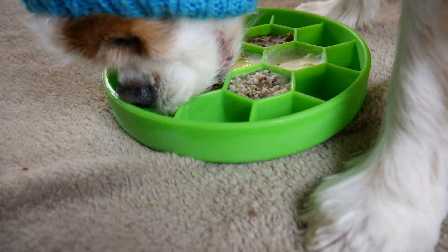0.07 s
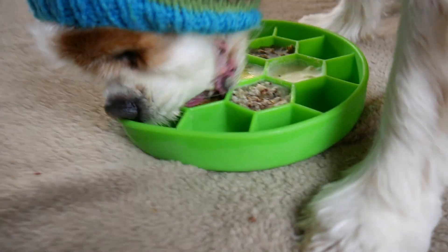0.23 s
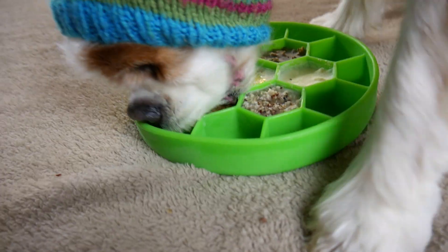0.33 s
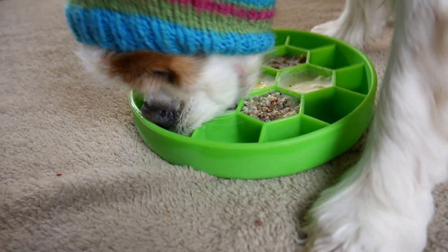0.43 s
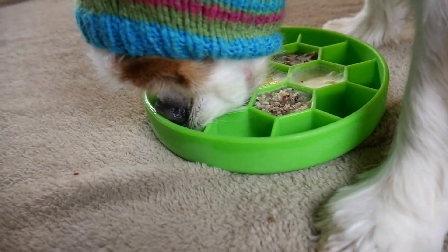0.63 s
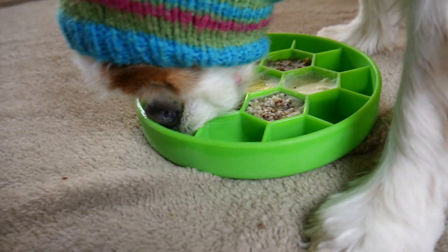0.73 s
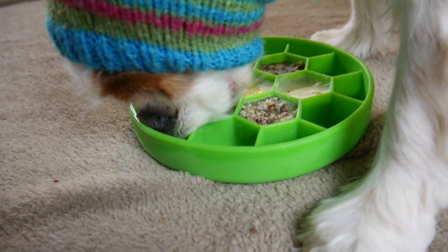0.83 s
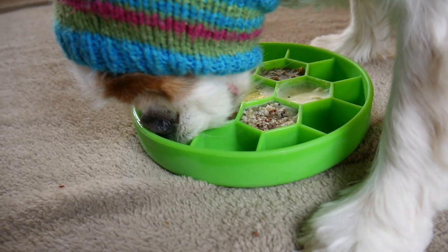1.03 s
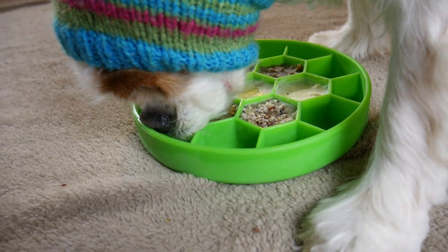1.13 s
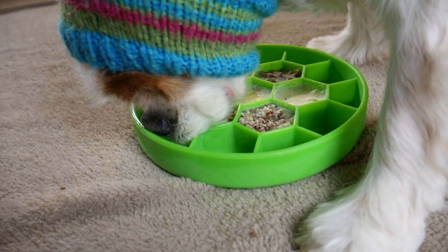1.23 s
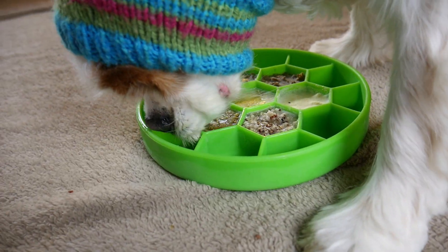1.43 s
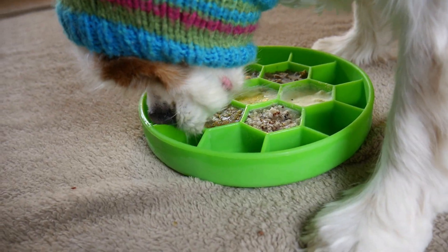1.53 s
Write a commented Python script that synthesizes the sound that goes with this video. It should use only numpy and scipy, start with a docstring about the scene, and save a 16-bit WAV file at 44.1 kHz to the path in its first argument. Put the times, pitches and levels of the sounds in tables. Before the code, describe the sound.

A dog eating hard frozen food, with sniffs, knocking bites and soft wet licks.

```python
"""A small dog works at frozen food in a silicone feeder bowl on a carpet, close by in a quiet room.
First it snuffles into the bowl, its breath hissing and resonating in the nose. Then it bites: teeth
knock on the hard food, dulled by the closed muzzle, and two hard bites push the bowl against the
floor, so that the room booms briefly. It goes on licking more softly: the tongue drags, small
cavities open with hollow pops and saliva films snap with wet clicks."""
import sys
import numpy as np
from scipy import signal
from scipy.fft import rfft, irfft
from scipy.io import wavfile

SR = 44100
rng = np.random.default_rng(int(sys.argv[2]) if len(sys.argv) > 2 else 0)


def store_wav(level_fs):
    """Save 16-bit WAV to argv[1]."""
    pcm = np.round(np.clip(np.atleast_2d(level_fs), -1, 1) * 32767)
    wavfile.write(sys.argv[1], SR, pcm.T.astype(np.int16))


N = 70560
T = np.arange(N) / SR
SHORT = T[:4096]   # time axis of one transient


def from_db(db):
    """Amplitude ratio of a level in decibels."""
    return 10 ** (np.asarray(db) / 20)


def peak_one(x):
    """Normalisation to a peak of 1."""
    return x / np.abs(x).max()


def rms_one(x):
    """Normalisation to an rms of 1."""
    return x / np.sqrt(np.mean(x ** 2) + 1e-20)


def cut(x, hz, kind, order=2):
    """Butterworth filter: maximally flat in its passband."""
    sections = signal.butter(order, np.clip(hz, 10, .45 * SR), kind, fs=SR, output="sos")
    return signal.sosfilt(sections, x)


def resonate(x, hz, width_hz):
    """Damped two-pole resonator with unit gain at its peak."""
    radius = np.exp(-np.pi * width_hz / SR)
    feedback = [1, -2 * radius * np.cos(2 * np.pi * hz / SR), radius ** 2]
    return signal.lfilter(np.array([1, 0, -1]) * (1 - radius ** 2) / 2, feedback, x)


def add(out, start_s, sound):
    """Superposition: a sound is summed into the mix from its start time."""
    i = max(int(start_s * SR), 0)
    out[..., i:i + sound.shape[-1]] += sound[..., :max(N - i, 0)]


def noise(spectrum):
    """Spectral shaping of white noise by rows of frequency_hz, density_db; rms 1."""
    hz, db = np.transpose(spectrum)
    bins_hz = np.maximum(np.fft.rfftfreq(N, 1 / SR), 1)
    gain = from_db(np.interp(np.log(bins_hz), np.log(hz), db)) * np.minimum(bins_hz / hz[0], 1)
    return rms_one(irfft(rfft(rng.standard_normal(N)) * gain, N))


def stereo(mid, side):
    """Left and right as the sum and difference of mid and side."""
    return np.array([mid + side, mid - side])


def swell(peak_s, rise_s, fall_s):
    """Amplitude envelope with a rounded rise and fall about its peak."""
    return np.exp(-np.where(T < peak_s, (peak_s - T) / rise_s, (T - peak_s) / fall_s) ** 1.6)


def burst(decay_s, rise_s=0.00057):
    """A cluster of tiny fractures radiates noise that builds up and decays exponentially."""
    attack = 1 - np.exp(-(SHORT / rise_s) ** 2)
    return rng.standard_normal(len(SHORT)) * attack * np.exp(-SHORT / decay_s) + 1e-18


def room_tone(level_db=-56.5):
    """Stationary noise: a low murmur of air, less correlated and so wider in the treble."""
    # spectrum of the murmur: frequency_hz, density_db
    murmur = [(25, -31), (55, -8), (100, 4), (160, -2), (260, 0), (420, -11), (900, -13), (2200, -22.5),
              (7500, -30), (10000, -29), (15000, -37.5)]
    side = from_db(-4) * noise(murmur) + from_db(-1) * cut(noise(murmur), 900, "high", order=1)
    return from_db(level_db) * stereo(noise(murmur), side)


def snuffles(side_db=-13.5):
    """Turbulent flow through the nose: nasal resonance and hiss swell and fade with each puff."""
    # puffs of breath: peak_s, rise_s, fall_s, nasal_db, hiss_db
    puffs = [(0.062, 0.066, 0.082, -41.5, -47.5), (0.232, 0.039, 0.04, -40.5, -53),
             (1.19, 0.027, 0.039, -59.5, -62.5)]
    # spectrum of the nasal resonance: frequency_hz, density_db
    nasal_spectrum = [(150, -12.5), (500, -9.5), (900, -6), (1150, -6), (1330, -6.5), (1570, 2.5),
                      (1750, -4), (2050, -20), (3000, -48)]
    # spectrum of the hiss: frequency_hz, density_db
    hiss_spectrum = [(1500, -7.5), (2200, -1.5), (3000, -4), (3900, 0), (4450, 3.5), (5100, -6), (6400, -4),
                     (8000, -11), (10500, -6), (12500, -18), (15500, -28)]
    nasal, hiss = 0, 0
    for peak_s, rise_s, fall_s, nasal_db, hiss_db in puffs:
        flow = swell(peak_s, rise_s, fall_s)
        nasal += from_db(nasal_db) * flow
        hiss += from_db(hiss_db) * flow
    mid, side = (nasal * noise(nasal_spectrum) + hiss * noise(hiss_spectrum) for _ in range(2))
    return stereo(mid, from_db(side_db) * side)


def tongue_pops(rise_s=0.00074, splash_db=-8.5):
    """Cavity resonance: a pocket opens as the tongue leaves palate or food, and rings with a splash."""
    # opening cavities: start_s, level_db, pitch_hz, t60_s
    cavities = [(0.043, -26.5, 1635, 0.013), (0.2378, -23, 590, 0.032), (0.2421, -23.5, 2210, 0.028),
                (0.2422, -31, 3820, 0.0093), (0.2569, -25, 2223, 0.016), (0.4845, -34, 1630, 0.014),
                (0.4874, -20.5, 1440, 0.0083), (0.4942, -20.5, 1565, .009), (0.5645, -30.5, 474, .028),
                (0.658, -37, 1780, .012), (0.823, -50.5, 1887, .008), (1.0005, -42, 1095, .008),
                (1.2109, -40, 2270, 0.0067), (1.247, -46, 1725, .012), (1.327, -46, 1967, .011),
                (1.403, -49.5, 2050, .01), (1.4913, -36.5, 1070, .013), (1.547, -47, 1650, .008),
                (1.5562, -35, 1557, 0.015)]
    out = np.zeros(N)
    for start_s, level_db, pitch_hz, t60_s in cavities:
        envelope = (1 - np.exp(-(SHORT / rise_s) ** 2)) * from_db(-60 * SHORT / t60_s)
        ring = np.sin(2 * np.pi * pitch_hz * SHORT)
        splash_band_hz = [0.39 * pitch_hz, 1.375 * pitch_hz]
        splash = rms_one(cut(rng.standard_normal(len(SHORT)), splash_band_hz, "band", order=3))
        pop = peak_one(envelope * (ring + from_db(splash_db) * splash))
        add(out, start_s, from_db(level_db) * pop)
    return out


def wet_click(pitch_hz, decay_s=.0011, side_db=-12, treble_db=-12):
    """Impulsive excitation: a snapping film gives a bright burst with one broad resonance."""
    snap = stereo(burst(decay_s), from_db(side_db) * burst(decay_s))
    ring = resonate(snap, pitch_hz, width_hz=780)
    treble = from_db(treble_db) * cut(snap, 4550, "high")
    return peak_one(cut(ring + treble, 13500, "low"))


def tongue_crackle(clicks_per_s=36, base_db=-59.5, spread_db=1.5):
    """A random point process: the wet tongue gives faint clicks at scattered times and pitches."""
    out = np.zeros((2, N))
    for when, pitch, size in rng.random((int(clicks_per_s * N / SR), 3)):
        level_db = base_db + spread_db * min(-np.log(1 - size), 3)   # capped exponential distribution
        add(out, when * N / SR, from_db(level_db) * wet_click(pitch_hz=3000 * 4 ** pitch))
    return out


def tooth_knocks(muzzle_cutoff_hz=2150, crack_db=-24.5):
    """Impacts excite the muzzle's modes; harder contacts are brighter and carry a thin crack."""
    # contacts of teeth and jaw with the food: start_s, level_db, brightness_hz
    contacts = [(0.176, -41.5, 218), (0.2370, -29, 1002), (0.2950, -17, 640), (0.2973, -25, 700),
                (0.3394, -34, 436), (0.4970, -8, 2000), (0.4993, -1, 2140), (0.556, -33.5, 711),
                (0.5644, -27, 650), (0.6621, -34, 300), (0.6783, -36.5, 1217), (0.6809, -34.5, 250),
                (1.109, -45.5, 900), (1.210, -42, 128.2), (1.416, -40.5, 250), (1.4841, -34, 140),
                (1.4917, -38, 108), (1.5542, -39, 706)]
    # modes of the muzzle: pitch_hz, width_hz, level_db
    modes = [(169.4, 210, -10), (430, 110, -5), (559, 100, -4), (932, 290, -3), (1485, 330, 3),
             (1730, 330, 1.5), (2213, 180, -9)]
    impulse = signal.unit_impulse(len(SHORT)) + 1e-18
    muzzle = sum((-1) ** k * from_db(level_db) * resonate(impulse, pitch_hz, width_hz)
                 for k, (pitch_hz, width_hz, level_db) in enumerate(modes))
    muzzle = cut(muzzle, muzzle_cutoff_hz, "low", order=8)   # the closed mouth dulls the ring
    out = np.zeros(N)
    for start_s, level_db, brightness_hz in contacts:
        knock = peak_one(cut(muzzle, brightness_hz, "low"))
        crack = peak_one(cut(burst(decay_s=0.0024), muzzle_cutoff_hz, "high"))
        crack_gain = from_db(crack_db) * (brightness_hz / muzzle_cutoff_hz) ** 2
        add(out, start_s, from_db(level_db) * (knock + crack_gain * crack))
    return out


def tongue_drags(grain_db=2.5, grain_hz=407, side_db=-10.5):
    """Friction noise: the tongue drags over the food, made grainy by random amplitude modulation."""
    # strokes of the tongue: peak_s, rise_s, fall_s, level_db
    strokes = [(0.246, 0.019, 0.015, -47), (0.319, 0.075, 0.071, -55.5), (0.456, 0.048, 0.022, -58),
               (0.492, .011, 0.0082, -45), (0.559, .025, 0.028, -56.5), (0.615, 0.0142, 0.02, -57.5),
               (0.893, 0.0099, 0.031, -62.5), (1.181, .025, 0.03, -58)]
    # spectrum of the wet friction: frequency_hz, density_db
    friction = [(800, -4), (2100, 3.5), (3000, -3), (4400, -4), (6800, -5.5), (8000, -6.5), (10500, 1),
                (13000, -9), (15500, -12)]
    pressure = sum(from_db(level_db) * swell(peak_s, rise_s, fall_s)
                   for peak_s, rise_s, fall_s, level_db in strokes)
    roughness = rms_one(cut(rng.standard_normal(N), grain_hz, "low"))
    grain = rms_one(from_db(grain_db * roughness))
    return pressure * grain * stereo(noise(friction), from_db(side_db) * noise(friction))


def saliva_clicks():
    """Film rupture: each saliva film that snaps radiates one distinct click."""
    # snapping films: start_s, level_db, pitch_hz
    films = [(0.2365, -32.5, 4470), (0.242, -32.5, 11200), (0.2416, -34, 10600), (0.296, -33.5, 10800),
             (0.299, -42, 10690), (0.355, -46, 10700), (0.4278, -45.5, 9300), (0.451, -42, 9600),
             (0.458, -41, 10200), (0.4831, -27, 7050), (0.4868, -21, 6920), (0.4942, -24.5, 6900),
             (0.4992, -22, 10220), (0.505, -40.5, 6800), (0.5344, -36, 10800), (0.555, -32.5, 9760),
             (0.5598, -40, 9900), (0.565, -46, 10000), (0.5992, -37.5, 6900), (0.61, -37.5, 11000),
             (0.6135, -35.5, 10300), (0.659, -46, 11000), (0.6657, -44, 11430), (0.6793, -48.5, 4500),
             (0.7295, -47.5, 9600), (0.8206, -47, 3900), (0.8595, -50.5, 11750), (0.882, -49, 9700),
             (0.895, -36, 8900), (1.1289, -47.5, 10000), (1.2121, -42.5, 3600), (1.3273, -48.5, 3600),
             (1.4028, -47, 3270), (1.5099, -45, 5100)]
    out = np.zeros((2, N))
    for start_s, level_db, pitch_hz in films:
        add(out, start_s, from_db(level_db) * wet_click(pitch_hz))
    return out


def floor_boom():
    """Beating: each hard bite excites two close, damped modes of floor and room."""
    # low modes: pitch_hz, level_db, t60_s
    modes = [(90.4, 0.5, 0.37), (106.3, 3, 0.27)]
    # pushes of the bowl against the floor: start_s, level_db
    pushes = [(0.297, -38.5), (0.497, -31.5)]
    ring = sum((-1) ** k * from_db(level_db - 60 * T / t60_s) * np.sin(2 * np.pi * pitch_hz * T)
               for k, (pitch_hz, level_db, t60_s) in enumerate(modes))
    out = np.zeros(N)
    for start_s, level_db in pushes:
        add(out, start_s, from_db(level_db) * ring)
    return out


def squeaks():
    """Flow-driven oscillation: air squeezed through a wet gap whistles with a falling pitch."""
    # whistles: start_s, length_s, level_db, start_hz, end_hz
    whistles = [(0.326, .016, -42, 11400, 9100), (0.339, .011, -48.5, 11130, 10170)]
    out = np.zeros(N)
    for start_s, length_s, level_db, start_hz, end_hz in whistles:
        progress = np.linspace(0, 1, int(length_s * SR))
        phase = 2 * np.pi * np.cumsum(start_hz + (end_hz - start_hz) * progress) / SR
        envelope = peak_one(progress * (1 - progress) ** 2)
        add(out, start_s, from_db(level_db) * envelope * np.sin(phase))
    return out


def reverberation(source, delay_s=0.0029, side_db=-7):
    """Convolution with a diffuse tail in which each octave decays exponentially at its own rate."""
    # octave bands of the room's tail: centre_hz, level_db, t60_s
    octaves = [(170, -4, .4), (360, -14.5, 0.43), (722, -13, 0.35), (1440, -21, 0.34), (2920, -13, .25),
               (5677, -15.5, 0.29), (11520, -22, .18)]
    t = T[:SR // 2]
    tail = 0
    for centre_hz, level_db, t60_s in octaves:
        edges_hz = [centre_hz / np.sqrt(2), centre_hz * np.sqrt(2)]
        band = cut(rng.standard_normal((2, len(t))), edges_hz, "band", order=3)
        envelope = from_db(-60 * t / t60_s) * (t > delay_s)
        tail += from_db(level_db) * band * envelope / np.sqrt(np.sum(envelope ** 2))
    response = stereo(tail[0], from_db(side_db) * tail[1])
    return signal.fftconvolve(source[None], response, axes=1)[:, :N]


def scene(knock_balance_db=1.5):
    """Superposition of the dog's direct sound, near the centre, and the sound of the room."""
    ambience = room_tone()
    slightly_left = from_db([[knock_balance_db / 2], [-knock_balance_db / 2]])
    dog = snuffles() + tongue_drags() + slightly_left * tooth_knocks()
    dog += tongue_pops() + saliva_clicks() + squeaks()
    return dog + reverberation(dog.mean(axis=0)) + floor_boom() + tongue_crackle() + ambience


def record(dry, low_hz=45, high_hz=15800):
    """Band limiting: the deep bass is thinned and the highest treble is cut steeply."""
    lowpass = signal.ellip(10, .1, 80, high_hz, fs=SR, output="sos")
    return signal.sosfilt(lowpass, cut(dry, low_hz, "high"))


dry = scene()
out = record(dry)
store_wav(out)
```